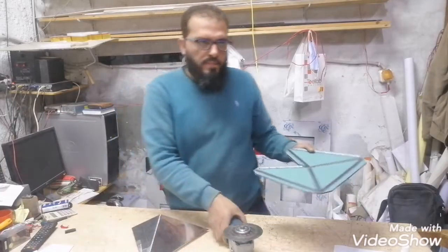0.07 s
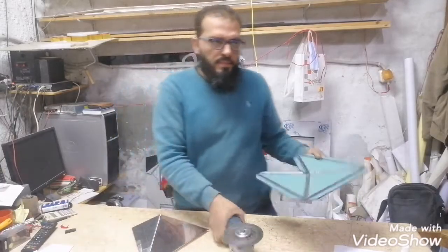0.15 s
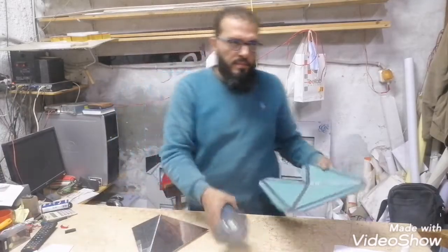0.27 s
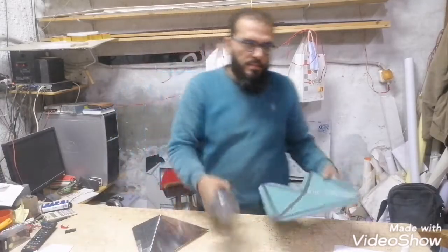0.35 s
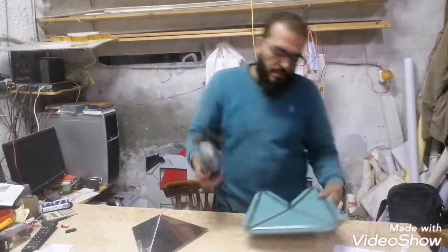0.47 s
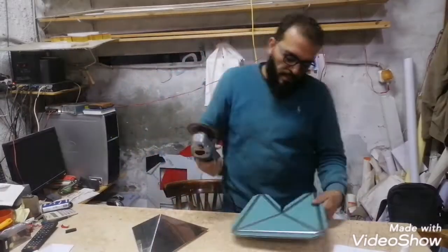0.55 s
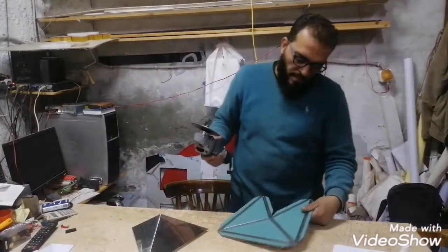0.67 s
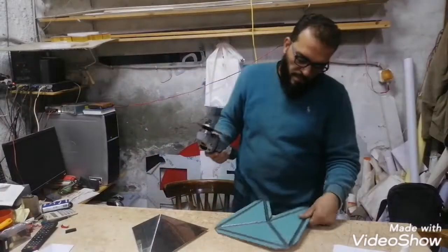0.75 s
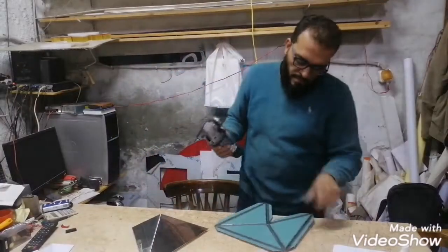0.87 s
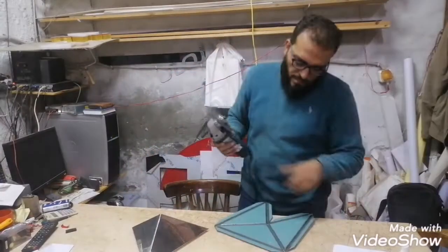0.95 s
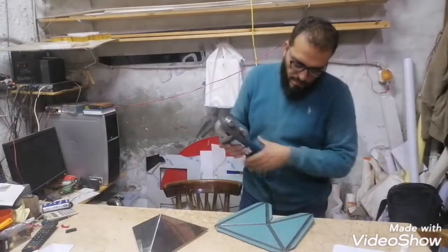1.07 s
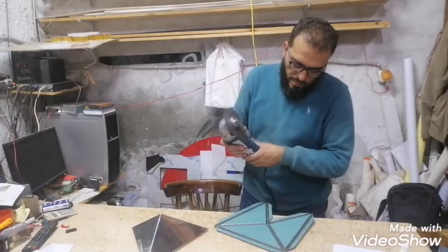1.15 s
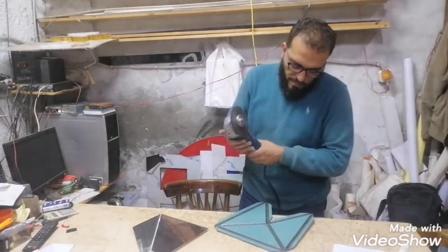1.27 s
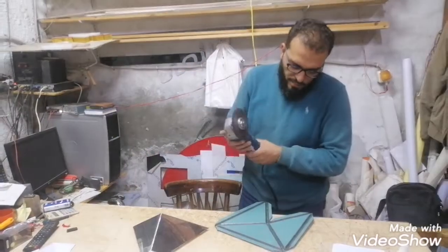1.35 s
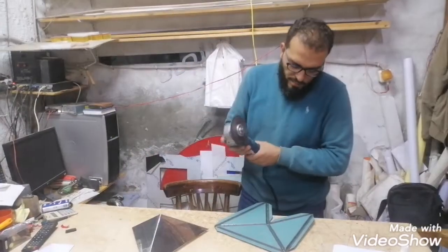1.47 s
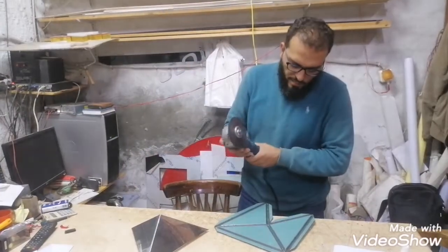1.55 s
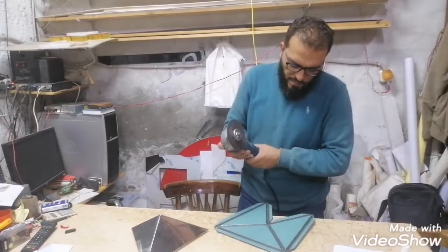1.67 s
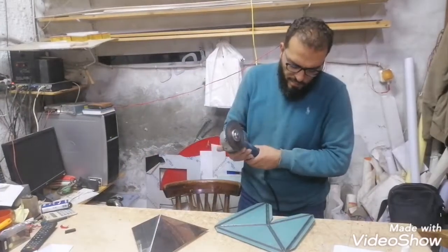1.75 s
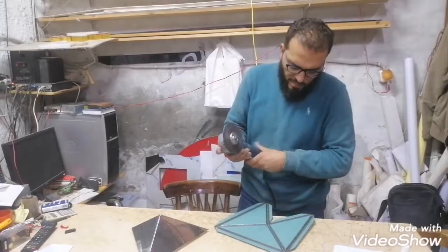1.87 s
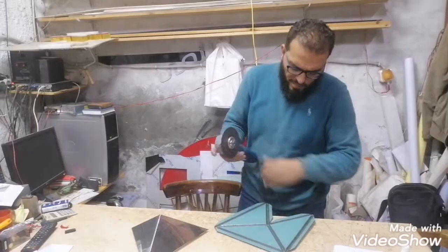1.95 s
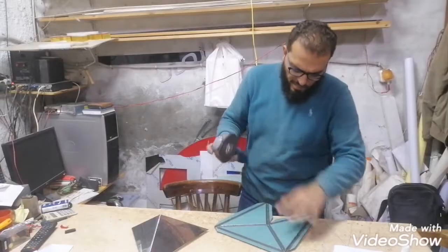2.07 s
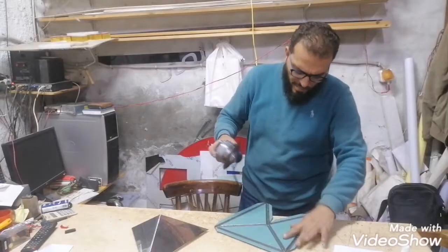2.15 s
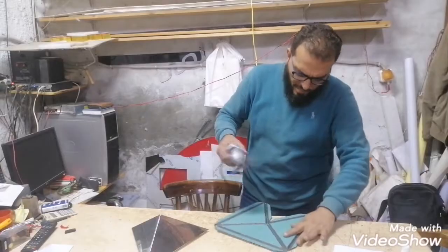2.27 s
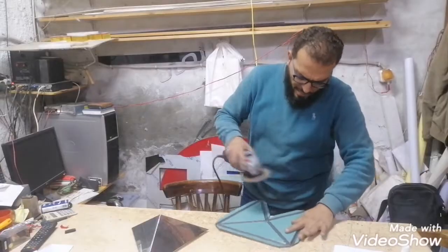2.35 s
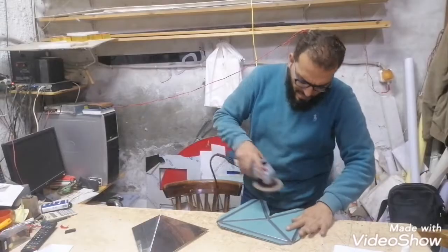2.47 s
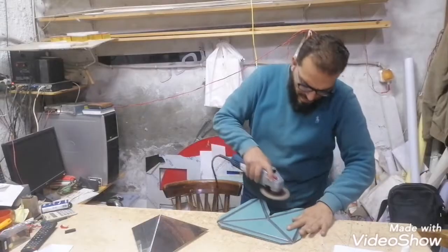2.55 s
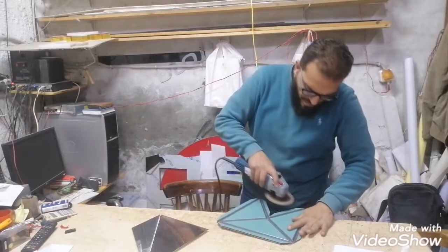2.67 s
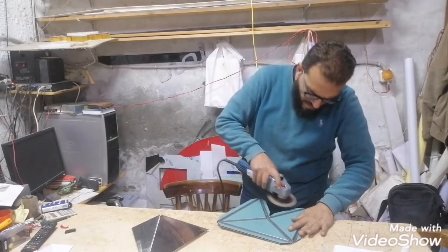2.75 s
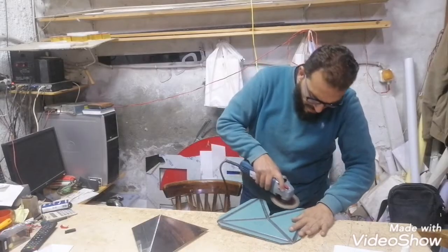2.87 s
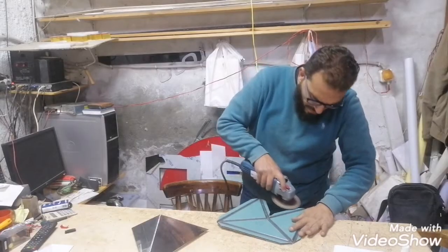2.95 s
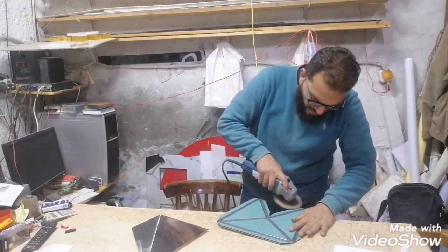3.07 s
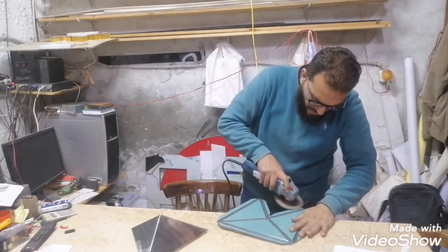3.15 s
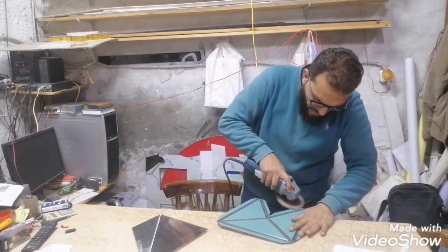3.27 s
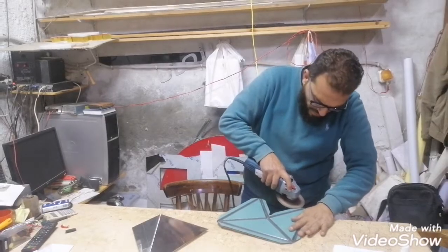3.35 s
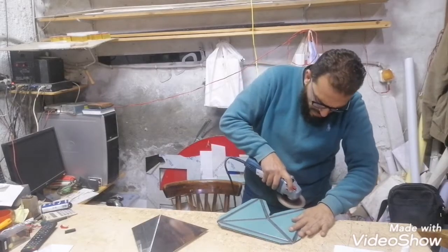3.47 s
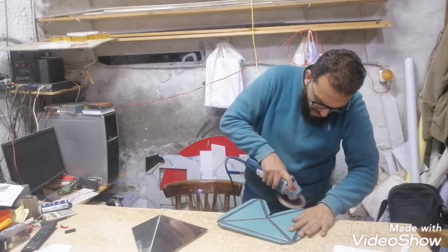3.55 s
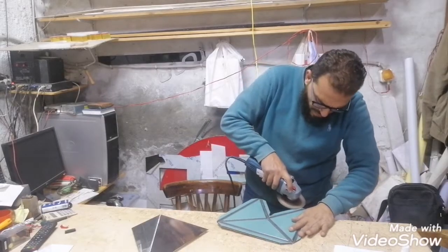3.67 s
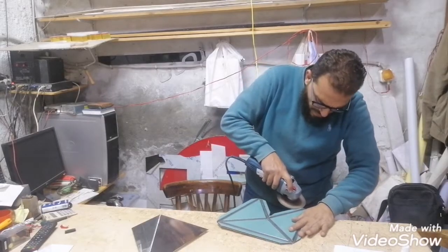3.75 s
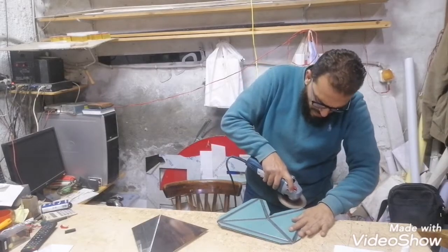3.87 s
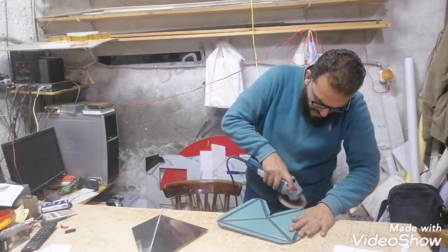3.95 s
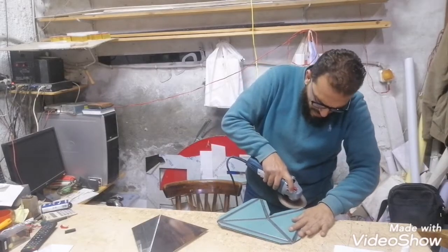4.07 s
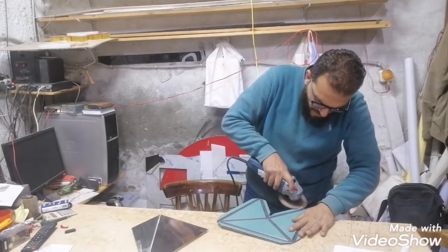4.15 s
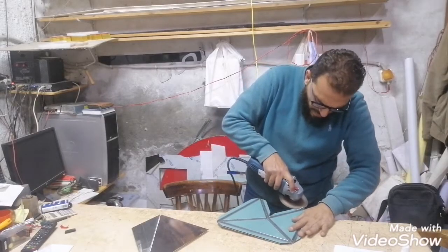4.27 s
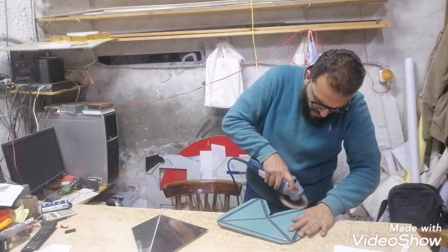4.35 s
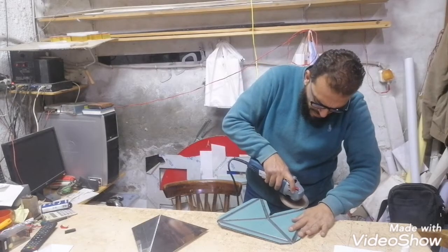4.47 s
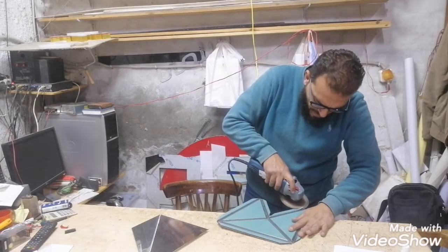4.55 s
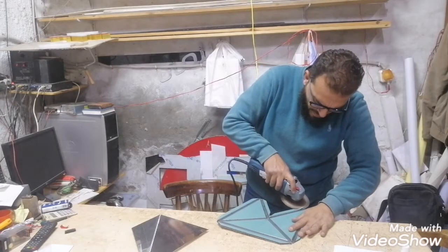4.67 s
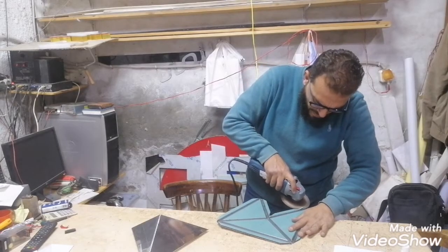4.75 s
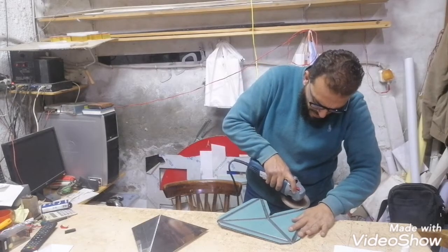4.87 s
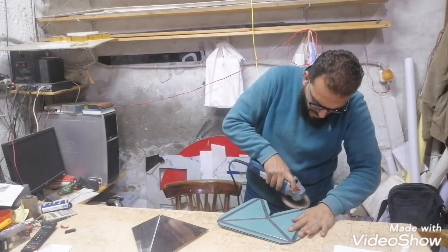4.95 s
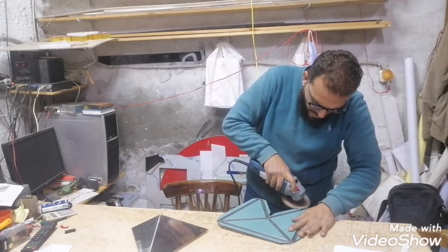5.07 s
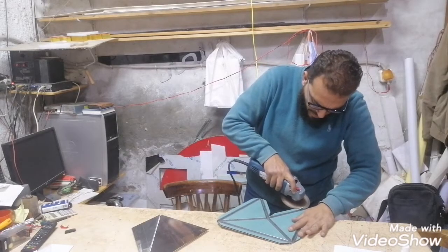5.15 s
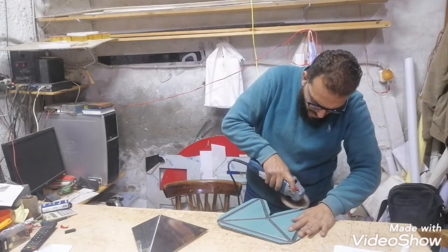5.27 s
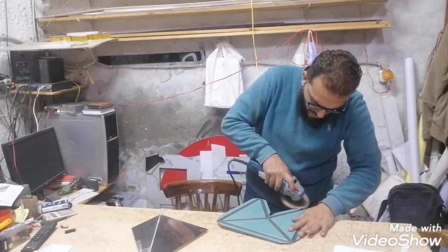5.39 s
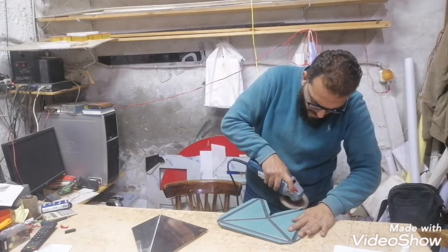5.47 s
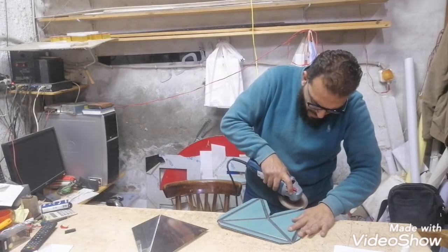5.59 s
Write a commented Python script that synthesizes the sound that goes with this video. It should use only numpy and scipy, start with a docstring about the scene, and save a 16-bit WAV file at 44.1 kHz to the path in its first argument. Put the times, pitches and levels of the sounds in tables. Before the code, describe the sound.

Tool scrapes off a workbench, a thin panel clatters down, then an angle grinder kicks on, spins up whining, and grinds steadily with a sagging rasp.

```python
"""In a small workshop a grinder is dragged off the bench with a thud: noise bands slide, bench tones ring.
A panel is then laid down and rattles to rest: short bursts of ringing tones and treble grit.
At about 1.6 s the grinder is switched on, kicks with the mains and spins up: tones and noise follow its speed.
At about 3.1 s the disc bites and slaps the panel once a turn, a stack of overtones, while the load slows it.
A low bench rumble lies underneath. Both channels carry the same sound."""
import sys
import numpy as np
from scipy import signal
from scipy.fft import rfft, irfft, next_fast_len
from scipy.io import wavfile
from scipy.ndimage import uniform_filter1d, map_coordinates

SR = 44100
rng = np.random.default_rng(int(sys.argv[2]) if len(sys.argv) > 2 else 0)


def wrap_up_sound(samples):
    """Save the sound to the file named by the first command line argument, as 16-bit audio."""
    columns = np.atleast_2d(samples).T
    # keep every value between -1 and 1, then stretch to whole-number steps
    tamed = np.clip(columns, -1, 1)
    steps = np.round(tamed * 32767).astype(np.int16)
    wavfile.write(sys.argv[1], SR, steps)


N = 247842  # length in samples

GEAR = 32 / 9  # armature turns for one disc turn
SWITCH_ON_S, BITE_S = 1.5885, 3.12  # the switch closes; the disc meets the panel

# the armature spins up free, then sags under the cut: start_s, armature_turns_per_s
ARMATURE_SPEED = [(1.6, 72), (1.635, 170), (1.67, 250), (1.712, 295), (1.778, 360), (1.936, 427),
                  (2.04, 454), (2.176, 483.5), (2.6, 522.5), (3.05, 536.5), (3.12, 543), (3.55, 528),
                  (3.86, 507.4), (4.09, 497), (4.4, 475.4), (4.68, 465), (5.03, 456.5), (5.45, 447.5),
                  (5.62, 446.5)]


def shaft_turns():
    """Disc speed, and the turns made so far; the armature runs GEAR times faster."""
    speed = curves(ARMATURE_SPEED)[0] / GEAR
    return speed, np.cumsum(speed) / SR


def mains_pulses():
    """Torque pulses counted from switch-on: a slightly slow start, then 100 a second, with jitter."""
    t = np.arange(N) / SR - SWITCH_ON_S
    steady = 96.5 * np.minimum(t, 0.2) + 100 * np.maximum(t - 0.2, 0)
    return steady - 0.12 + 0.08 * wobble(70)


# how loud the free armature tone is at each speed: pitch_hz, level_db
WHINE_LEVEL = [(68, -70), (230, -58), (320, -46), (380, -32), (427, -21), (490, -23), (520, -31),
               (545, -31)]
# how the housing passes the commutator's tone: pitch_hz, level_db
COMMUTATOR_LEVEL = [(800, -50), (2600, -40), (3100, -28), (3500, -28), (3850, -32), (4100, -38),
                    (4400, -29), (4640, -24), (4800, -27), (4920, -40), (5150, -37), (5450, -33),
                    (5700, -36), (5900, -37), (6000, -46), (6600, -58)]
# the 9 pinion teeth, running free: pitch_hz, level_db
PINION_LEVEL = [(600, -44), (1100, -30), (1350, -22), (1600, -24), (1850, -17.5), (2200, -18.5),
                (2400, -27), (2700, -34), (3300, -42), (3700, -35), (4000, -44), (5000, -55)]
# the pinion's second overtone, a rough chatter: pitch_hz, level_db
CHATTER_LEVEL = [(3000, -50), (4400, -38), (4950, -25.5), (5400, -29), (5700, -39), (6200, -33),
                 (6600, -40), (7200, -50), (9000, -60)]
LOADED_DB, LOADED_FALL_DB_PER_S = -34.5, 3  # armature tone under load, fading as the cut goes on
LOAD_HUSH_DB = 30  # commutator, pinion and chatter sink by this as the disc bites
TENTH_DB, TENTH_S = -42, 4.45  # the armature's tenth order joins under load


def motor_tones(speed, turns, mains):
    """The armature, commutator and pinion each sing at a fixed multiple of the shaft speed."""
    time = np.arange(N) / SR
    since_on = np.abs(time - SWITCH_ON_S)
    bite = after(BITE_S, 0.7)
    spin, pitch = GEAR * turns, GEAR * speed

    loaded_db = LOADED_DB - LOADED_FALL_DB_PER_S * (time - BITE_S)
    whine_db = (1 - bite) * along(WHINE_LEVEL, pitch) + bite * loaded_db
    whine = amp(whine_db + 1.6 * wobble(12)) * np.sin(2 * np.pi * spin)

    # the mains pulses shape these tones most strongly just after switch-on
    bars = amp(along(COMMUTATOR_LEVEL, 12 * pitch) + 1.8 * wobble(60))
    bars *= throb(mains, 0.55 + 1.5 * np.exp(-since_on / 0.08))
    bars *= np.sin(2 * np.pi * (12 * spin + 0.09 * wobble(150)))

    pinion = amp(along(PINION_LEVEL, 9 * pitch) + 2 * wobble(40))
    pinion *= throb(mains, 0.3 + 1.3 * np.exp(-since_on / 0.12))
    pinion *= np.sin(2 * np.pi * (9 * spin + 0.1 * wobble(150)))

    chatter = amp(along(CHATTER_LEVEL, 18 * pitch) + 3 * wobble(60)) * throb(mains, 1.6)
    chatter *= np.sin(2 * np.pi * (18 * spin + 0.3 * wobble(500)))

    tenth = amp(TENTH_DB + 3 * wobble(5)) * after(TENTH_S, 0.3) * np.sin(20 * np.pi * spin)
    tones = whine + amp(-LOAD_HUSH_DB * bite) * (bars + pinion + chatter) + tenth
    return np.sqrt(2) * after(SWITCH_ON_S, 0.001) * tones


# air and gear noise, levels before a small trim: start_s, roar_db, hiss_db, brightness_0_to_1
RUSH_LEVEL = [(1.59, -17.5, -31, 0.97), (1.7, -19, -33, 0.98), (1.77, -21.5, -27.5, 0.72),
              (1.94, -15, -23, 0.73), (2.15, -16.5, -23, 0.41), (2.24, -14.5, -21, 0.7),
              (2.45, -17, -21, 0.57), (2.71, -14.5, -20.5, 0.6), (3.06, -15.5, -21.5, 0.25),
              (3.5, -16.5, -23.5, 0.32), (3.96, -19, -27.5, 0.46), (4.3, -17.5, -25, 0.27),
              (4.77, -19, -26.5, 0.27), (5.34, -17.5, -25.5, 0.52), (5.62, -19.5, -25.5, 0.24)]
# tone colour of the roar when dull, then when bright: pitch_hz, level_db_per_hz
DULL_ROAR = [(35, -67), (70, -30), (150, -24.5), (437, -14), (512, -5.5), (559, -10), (690, -5),
             (883, -3.5), (1370, -3), (1950, -6.5), (2770, -19), (4000, -12.5), (5200, -78), (8800, -120)]
BRIGHT_ROAR = [(35, -61), (60, -68), (96, -40), (147, -45), (188, -16.5), (297, -18), (360, -12.5),
               (521, -4.5), (1230, -6), (2020, 1), (4000, -13), (5200, -88), (8800, -120)]
# tone colour of the hiss running free, then cutting: pitch_hz, level_db_per_hz
FREE_HISS = [(1470, 5), (2500, 3), (3310, -4.5), (4010, 0), (4730, -1.5), (5660, -1.5), (6270, -9.5),
             (7500, -5.5), (8480, -12.5), (9270, -11.5), (10100, -20), (11700, -26.5), (12900, -55),
             (16800, -71), (22000, -120)]
CUTTING_HISS = [(1470, -62), (2500, -5), (2610, -7), (3050, -9), (3350, -5.5), (3650, -2), (4130, -2),
                (4450, -2), (6190, -14.5), (7860, -12), (10900, -25.5), (12200, -51), (12900, -44),
                (16800, -80), (22000, -120)]
# a hump in the roar slides about before the cut, and swells again near the end: start_s, pitch_hz, level_db
ROAR_HUMP = [(1.9, 1900, -51), (2.1, 2000, -30), (2.3, 2116, -29), (2.42, 1262, -24.5), (2.55, 1349, -22.5),
             (2.65, 1501, -21.5), (2.76, 1850, -19.5), (2.88, 1690, -25), (3.0, 1893, -25),
             (3.2, 1510, -51), (5.32, 1500, -54), (5.45, 1504, -26), (5.58, 1434, -37)]
# a breathy whistle in the treble: start_s, pitch_hz, level_db
TREBLE_WHISTLE = [(2.5, 7200, -60), (2.7, 7300, -44), (3.0, 7600, -42), (3.45, 7880, -44), (3.8, 7700, -50),
                  (4.1, 7900, -47), (5.62, 7780, -46)]
# a low drone while the motor gathers speed: start_s, pitch_hz, level_db
LOW_DRONE = [(1.58, 185, -57), (1.75, 193, -49.5), (1.9, 225.1, -44), (2.05, 240, -58)]


def air_and_gear_noise(turns, mains):
    """Fan and gears make broad noise, beaten by the mains torque and, under load, by the disc."""
    roar_db, hiss_db, bright = curves(RUSH_LEVEL)
    since_on = np.abs(np.arange(N) / SR - SWITCH_ON_S)
    bite = after(BITE_S, 0.7)
    kick = 0.55 * np.exp(-since_on / 0.22)  # torque pulses are hardest while the armature is slow

    share = np.clip(bright, 0, 1)
    roar = np.sqrt(1 - share) * noise(DULL_ROAR, patchy_db=-0.5)
    roar += np.sqrt(share) * noise(BRIGHT_ROAR, patchy_db=1.0)
    roar *= amp(roar_db - 4 + 0.99 * wobble(25.21)) * throb(mains, kick) * throb(turns, 0.0057 * bite)

    hiss = np.sqrt(1 - bite) * noise(FREE_HISS, patchy_db=1.5)
    hiss += np.sqrt(bite) * noise(CUTTING_HISS, patchy_db=1.0)
    hiss *= amp(hiss_db + 0.64 * wobble(30)) * throb(mains, kick + 0.083) * throb(turns, 0.28 * bite)

    bands = narrow(ROAR_HUMP, width_hz=600, rough_db=1.0)
    bands += narrow(TREBLE_WHISTLE, width_hz=450, rough_db=2)
    bands += narrow(LOW_DRONE, width_hz=40, rough_db=1)
    return after(SWITCH_ON_S, 0.001) * (roar + hiss + bands)


# tone colour of the gear housing: pitch_hz, level_db_per_hz
HOUSING_COLOUR = [(1200, -40), (1700, -37), (2150, 1), (2700, -8), (3600, -26), (4500, -8), (5100, -8.5),
                  (5800, -6.5), (8000, -28), (11000, -68)]
# gear slack knocking with the mains torque: start_s, level_db
GEAR_KNOCK = [(1.588, -29), (1.62, -29), (1.655, -23), (1.68, -27), (1.705, -21), (1.74, -24), (1.8, -28),
              (2.0, -30), (2.3, -68)]
# the disc guard's rattle, before its mains swells: start_s, pitch_hz, level_db
GUARD_RATTLE = [(2.15, 3900, -55), (2.27, 4100, -32), (2.5, 4250, -30), (2.6, 4100, -45), (3.3, 4000, -40),
                (4.0, 4000, -40), (4.27, 4050, -31), (4.45, 4100, -34), (4.62, 4050, -29),
                (4.75, 4050, -32), (4.92, 4000, -34), (5.1, 4000, -39), (5.62, 4000, -38)]


def rattles(mains):
    """Gear slack and disc guard are shaken at twice the mains rate, so their noise comes in pulses."""
    since_on = np.abs(np.arange(N) / SR - SWITCH_ON_S)
    guard = amp(3.5 * wobble(70)) * throb(mains, 2.2) * narrow(GUARD_RATTLE, width_hz=450, rough_db=1.5)
    knock = amp(curves(GEAR_KNOCK)[0] + 2.2 * wobble(70)) * noise(HOUSING_COLOUR, patchy_db=3)
    knock *= throb(mains, 1.2 + 1.6 * np.exp(-since_on / 0.2))
    return after(SWITCH_ON_S, 0.001) * (guard + knock)


# the tool body ringing at switch-on, before a trim: pitch_hz, level_db, fade_60db_s
BODY_LURCH = [(578, -7, 0.11), (1130, -6, 0.022), (1700, -8, 0.016), (2460, -6, 0.017), (5000, -10, 0.016)]
HUM_DB, HUM_FADE_60DB_S = -49, 0.9  # mains hum


def switch_on():
    """A faint few milliseconds of noise just before the motor starts, then body ringing and a fading mains hum."""
    t = np.arange(N) / SR - SWITCH_ON_S
    lead_in = amp(-39) * after(SWITCH_ON_S - 0.004, 0.001) * (t < 0)
    lead_in = lead_in * noise(HOUSING_COLOUR, patchy_db=1.5)
    hum = amp(HUM_DB - 60 * np.abs(t) / HUM_FADE_60DB_S) * np.sin(2 * np.pi * 100 * t)
    lurch = np.pad(amp(-15.5) * ring(BODY_LURCH, 0.00071), (round(SWITCH_ON_S * SR), N))
    return lead_in + after(SWITCH_ON_S, 0.001) * hum + lurch[:N]


# slap along the cut: start_s, level_db, answer (0 to 4, blends five panel colours)
SLAP_LEVEL = [(3.12, -16, 3.7), (3.2, -23.5, 0.97), (3.45, -22.5, 0.07), (3.6, -22.5, 1.3),
              (3.7, -23.5, 2.1), (3.88, -22.5, 2.3), (4.05, -26, 2.67), (4.35, -26.5, 3),
              (4.95, -27.5, 3.12), (5.25, -29, 3.8), (5.62, -27.5, 3.53)]
# the five panel colours, answers 0 to 4 to the slap: pitch_hz, level_db
PANEL_COLOUR_0 = [(380, -42), (650, -12), (1050, -13), (1330, -13), (1460, -22), (1680, -1.5), (1950, -7),
                  (2450, -19), (2670, -17), (2880, -5.5), (3080, -16), (3450, -17), (3750, -8), (4290, -30),
                  (7260, -120)]
PANEL_COLOUR_1 = [(380, -46), (650, 3), (841, -71), (1240, -12), (1440, -8.5), (1740, -4.5), (2160, -15),
                  (2410, -28), (2620, -12.5), (2850, -14), (3100, -28), (4200, -30), (5460, -44),
                  (9240, -120)]
PANEL_COLOUR_2 = [(380, -34), (650, -21), (860, -11.5), (1010, -21), (1155, -13), (1300, -4), (1445, -1.5),
                  (1590, -4), (1735, -9), (1880, -6.5), (2020, -9.5), (2310, -17), (2460, -20), (2620, -13),
                  (2760, -20), (2890, -15), (3300, -22), (4290, -39), (7260, -120)]
PANEL_COLOUR_3 = [(380, -47), (660, -12.5), (790, -5.5), (920, -25), (1050, -8), (1185, -14.5),
                  (1310, -13.5), (1445, -2.5), (1580, -1.5), (1710, -9.5), (1845, -19), (1975, -2),
                  (2110, -8.5), (2240, -8.5), (2400, -11), (2600, -23), (2760, -11.5), (2950, -18),
                  (3300, -21), (4290, -40), (7260, -120)]
PANEL_COLOUR_4 = [(380, -40), (650, -1), (997, -6), (1130, -10.5), (1260, 0.5), (1380, -7), (1520, -3.5),
                  (1670, -10), (1890, -13), (2080, 1), (2180, -10), (2320, -14), (2690, -27), (2920, -5),
                  (3300, -13), (4290, -44), (7260, -120)]
# the sharpest panel modes lift an overtone passing them: pitch_hz, width_hz, lift_db
PANEL_LIFTS = [(1433, 79, 7), (1736, 35, 10), (2630, 58, 9), (1093, 41, 8.5), (3216, 19, 12.5)]
# resonances that lift the high overtones: pitch_hz, width_hz, lift_db
HIGH_LIFTS = [(6950, 130, 6), (7880, 170, 7)]
# levels of the four lowest disc overtones, by pitch as the disc slows: pitch_hz, level_db
LOW_OVERTONES = [(124, -38), (128, -35.5), (136, -39), (142, -51.5), (154, -51.5), (250, -30.5), (256, -36),
                 (261, -48), (272, -30.5), (285, -29.5), (302, -38), (376, -36.5), (391, -45), (420, -34),
                 (455, -32.5), (503, -32), (520, -46.5), (572, -28), (610, -39)]
# some disc overtones are stronger than others: lift_db, one for each order from 5 to 37
ORDER_LIFT = [-0.5, 0, -0.5, 1.5, 1.5, 1, 0.5, -2.5, 2.5, 1, 2, 1, 2.5, -0.5, 2, 3, -4, 0, 3, -1.5, -0.5,
              -4, -1, -2, 3, 3, 2, -1, 1.5, -3, -4, -7, -8]
# the slap spreads over the turn: start_s, phase_scatter_rad (before its growth with order)
SLAP_SMEAR = [(3.12, 1.2), (3.6, .5), (3.95, .5), (4.15, 1.6), (5.62, 2)]
# the gear case rings for orders near the tooth mesh: pitch_hz, level_db
GEAR_CASE = [(3700, -45), (3940, -43), (4010, -32), (4130, -31.5), (4215, -33), (4320, -42), (4600, -45),
             (4900, -43), (5500, -48)]
MESH_DB = 2.5  # lift of the mesh order itself
SIDE_GROW_DB, SIDE_FROM_S, SIDE_RISE_S = 11, 3.95, 0.33  # its neighbours grow as the load builds
RING_SINKS_HZ, SINK_FROM_S, SINK_S = 110, 4.3, 0.5  # the case ring starts higher and settles
UNBALANCE_S = 2.82  # the disc's once-a-turn shake reaches the bench


def disc(speed, turns):
    """The disc's high spot slaps the panel once a turn; under load the 32 crown teeth sing, with neighbours."""
    slap_db, answer = curves(SLAP_LEVEL)
    smear = curves(SLAP_SMEAR)[0]
    phase = 2 * np.pi * (turns + 0.00041 * wobble(40))

    low = []
    for k in range(1, 5):
        level = amp(along(LOW_OVERTONES, k * speed) + 1.8 * wobble(9))
        low.append(np.sqrt(2) * level * np.sin(k * phase + k))
    shake, out = low[0], sum(low[1:])

    colours = (PANEL_COLOUR_0, PANEL_COLOUR_1, PANEL_COLOUR_2, PANEL_COLOUR_3, PANEL_COLOUR_4)
    weights = [np.clip(1 - np.abs(np.clip(answer, 0, 4) - i), 0, 1) for i in range(5)]
    for k in range(5, 29):
        answer_db = sum(weight * along(colour, k * speed) for weight, colour in zip(weights, colours))
        answer_db += lift(PANEL_LIFTS, k * speed) + ORDER_LIFT[k - 5]
        # each overtone lags as the slap rings on in the modes near it
        lag = np.arctan((k * speed - 1450) / 400) + smear * rng.normal(0, k / 11)
        out += np.sqrt(2) * amp(slap_db + answer_db + 1.5 * wobble(5)) * np.cos(k * phase - lag)

    ring_shift_hz = RING_SINKS_HZ * (1 - after(SINK_FROM_S, SINK_S))
    for k in range(29, 38):
        lift_db = MESH_DB if k == 32 else SIDE_GROW_DB * (after(SIDE_FROM_S, SIDE_RISE_S) - 1)
        level_db = along(GEAR_CASE, k * speed - ring_shift_hz) + lift_db + ORDER_LIFT[k - 5]
        out += np.sqrt(2) * amp(level_db + 1.5 * wobble(8)) * np.sin(k * phase + rng.normal(0, 0.3))

    # faint high overtones carry the colour of the hiss and come and go
    for k in range(38, 66):
        level_db = slap_db - 14 + along(CUTTING_HISS, k * speed) + lift(HIGH_LIFTS, k * speed)
        out += amp(level_db + 3 * wobble(6)) * np.sin(k * phase + rng.normal(0, 2))
    return after(BITE_S, 0.1) * out + after(UNBALANCE_S, 0.082) * shake


# the panel touching the bench, before a trim: start_s, level_db, treble_db
PANEL_TAPS = [(0.387, -41.5, -25), (0.491, -47, -12), (0.569, -46, -6), (0.608, -25, -15),
              (0.618, -37.5, 5), (0.697, -40, 2.5), (0.77, -5.5, -24), (0.785, -4, -18), (0.796, -6, -16.5),
              (0.823, -17, -22), (0.847, -8.5, -12.5), (0.858, -16, -12), (0.868, -17.5, -18),
              (0.876, -35, -7), (0.942, -18, -19), (0.949, -20.5, -28), (1.056, -20, -28),
              (1.077, -24.5, -16)]
# tones the panel rings with: pitch_hz, level_db, fade_60db_s
PANEL_TONES = [(460, -8, .04), (590, -3, 0.035), (874, -2, 0.045), (1054, -6, 0.04), (1293, -3, 0.046),
               (1500, -6, 0.038), (1823, -4, 0.03), (2020, -0.5, 0.03), (2490, -13, 0.025),
               (2830, -14, 0.025)]
# treble colour of a tap: pitch_hz, level_db_per_hz
TAP_TREBLE = [(2000, -30), (2600, -3), (3100, -9), (3700, 2), (4150, -8), (4600, 0), (5200, -6), (5800, -2),
              (7000, -12), (8500, -24), (10000, -60)]
REBOUND_S, REBOUND_DB = 0.0052, -7.5  # the panel springs back onto the bench after each tap
CRACK_FADE_60DB_S, BUZZ_FADE_60DB_S, BUZZ_DB = 0.007, 0.03, -12


def panel_taps():
    """Each touch rings the panel's tones, with a sharp crack and a longer buzz, then rings it again."""
    out = np.zeros(N + SR)
    t, grit = np.arange(SR // 3) / SR, noise(TAP_TREBLE, patchy_db=2)
    snap = amp(-60 * t / CRACK_FADE_60DB_S) + amp(BUZZ_DB - 60 * t / BUZZ_FADE_60DB_S)
    snap *= 1 - np.exp(-t / 0.0001)
    for start, db, treble_db in PANEL_TAPS:
        at = round(start * SR)
        again = at + round(REBOUND_S * SR)
        treble = amp(treble_db + 12) * snap * grit[at:][:len(t)]
        out[at:][:len(t)] += amp(db - 11) * (ring(PANEL_TONES, 0.0004) + treble)
        out[again:][:len(t)] += amp(db - 11 + REBOUND_DB) * ring(PANEL_TONES, 0.0006)
    return out[:N]


# blows on the bench top, before a trim: start_s, level_db
BENCH_THUDS = [(.187, -26), (0.196, -27), (.206, -32), (0.233, -34), (0.268, -35), (.281, -34), (.31, -40),
               (.389, -46), (0.77, -34), (0.791, -31), (0.821, -32), (.848, -38), (.943, -31),
               (.951, -30.5)]
# tones the bench rings with: pitch_hz, level_db, fade_60db_s
BENCH_TONES = [(99, -6, .06), (147, -1.5, 0.07), (219, -1, 0.11), (281, 4.5, 0.06), (377, -5, 0.075),
               (482, -0.5, 0.058), (590, -6.5, .03)]


def bench_thuds():
    """Each blow rings the low tones of the bench top."""
    out = np.zeros(N + SR)
    for start, db in BENCH_THUDS:
        out[round(start * SR):][:SR // 3] += amp(db - 2.0) * ring(BENCH_TONES, 0.002)
    return out[:N]


# tone colour of the dull scuff, then of the airy swish: pitch_hz, level_db_per_hz
SCUFF_COLOUR = [(120, -70), (200, -13), (300, -8), (572, -16), (690, -6), (1120, -9), (1950, -10),
                (2760, -12.5), (3160, -13.5), (5000, -28), (6500, -53), (11000, -120)]
SWISH_COLOUR = [(880, -52), (1500, -9), (1740, -8.5), (2180, -13), (2670, -7.5), (3020, -9.5), (5840, -1.5),
                (9710, -25.5), (11000, -37), (14300, -69), (22000, -120)]
# narrow scrapes of an edge on the bench: start_s, length_s, pitch_hz, level_db
EDGE_SCRAPES = [(0.198, .15, 1250, -54), (.42, .16, 2760, -65), (0.485, .014, 2950, -55),
                (0.737, .03, 2910, -54), (0.562, 0.05, 2800, -54), (.69, .018, 2050, -48),
                (.955, .07, 4800, -54), (1.086, 0.065, 2200, -46), (1.09, 0.13, 1550, -45),
                (1.165, 0.056, 5100, -57.5), (1.183, 0.036, 2740, -46), (1.195, 0.096, 1975, -46),
                (1.287, 0.055, 3250, -64.5)]
SCUFF_FALL = 0.3  # the scuff falls slower than the swish


def slides():
    """Hands, tool and panel rub along the bench: coloured noise with narrow scrapes."""
    scuff = strokes(order=1, slower=SCUFF_FALL) * amp(3 * wobble(40)) * noise(SCUFF_COLOUR, patchy_db=3)
    swish = strokes(order=0, slower=1) * amp(1.5 * wobble(40)) * noise(SWISH_COLOUR, patchy_db=3.5)
    scrapes = sum(scrape(*row) for row in EDGE_SCRAPES)
    return (scuff + swish + scrapes) * (1 - after(1.6, 0.34))


def scrape(start, length, hz, db):
    """One short band of noise around a pitch."""
    band = narrow([(0, hz, 0)], width_hz=350, rough_db=2.5)
    return stroke(start, rise=0.0063, length=length, fall_db=60, db=db) * band


# sliding on the bench: start_s, rise_s, length_s, fall_db_per_s (of the swish), swish_db, scuff_db, rumble_db
SLIDE_STROKES = [(0.032, 0.065, 0.31, 170, -27.5, -61, -42), (0.538, 0.054, 0.27, 2, -55, -52, -49),
                 (.765, 0.027, 0.12, 200, -46, -39, -32), (0.848, 0.0033, 0.1, 300, -56, -42.5, -30),
                 (0.935, 0.023, 0.261, 54, -46.5, -46.5, -45.5), (1.258, 0.017, 0.025, 100, -69, -57, -53)]
# level between strokes: swish_db, scuff_db, rumble_db
QUIET_LEVEL = [-79, -62.5, -57.5]


def strokes(order, slower):
    """All strokes for one layer (0 swish, 1 scuff, 2 rumble), over its quiet level."""
    moves = sum(stroke(*row[:3], slower * row[3], row[4 + order]) for row in SLIDE_STROKES)
    return amp(QUIET_LEVEL[order]) + moves


RELEASE_S, RISE_DB = 0.03, 33.5  # a stroke climbs by RISE_DB, and sinks as far in each RELEASE_S at its end


def stroke(start, rise, length, fall_db, db):
    """Gain of one stroke: rise, slow fall, release."""
    t = np.arange(N) / SR - start - rise
    shape_db = np.where(t < 0, RISE_DB * t / rise, -fall_db * t)
    shape_db -= RISE_DB * np.maximum(t + rise - length, 0) / RELEASE_S
    return amp(np.maximum(db + shape_db, -140))


# tone colour of the bench rumble: pitch_hz, level_db_per_hz
RUMBLE_TONE = [(15, -4), (40, -4), (100, -5), (160, -7), (300, -52)]
# a hand leans on the panel: start_s, rise_s, length_s, fall_db_per_s, rumble_db (before a trim)
HAND_LEAN = (2.2, .25, 1.0, 10, -50)
RUMBLE_FALL = 0.6  # the rumble falls slower than the swish


def rumble():
    """Low rumble of the bench under hands and tool; it swells and sinks by chance."""
    level = strokes(order=2, slower=RUMBLE_FALL) + stroke(*HAND_LEAN)
    return amp(-7 + 3.5 * wobble(12) + 2.2 * wobble(4)) * level * noise(RUMBLE_TONE, patchy_db=1.0)


def room(x):
    """A short, cluttered room tail: fading random echoes after a brief gap."""
    t = np.arange(SR // 3) / SR
    tail = amp(-60 * t / 0.36) * rng.standard_normal(len(t))
    return signal.fftconvolve(np.pad(x, (300, 0)), tail / np.linalg.norm(tail))[:N]


def ring(modes, attack):
    """One blow: every mode sounds at a new strength and phase, then fades."""
    t = np.arange(SR // 3) / SR
    tones = np.zeros(len(t))
    for hz, db, fade_s in modes:
        level = amp(db + rng.normal(0, 2.8) - 60 * t / fade_s)
        tones += level * np.sin(2 * np.pi * (hz * t + rng.random()))
    return tones * (1 - np.exp(-t / attack))


def noise(spectrum, patchy_db):
    """Coloured noise of rms 1 with patches of random gain."""
    z = signal.stft(rng.standard_normal(N + 512), nperseg=512)[2]
    patches = uniform_filter1d(uniform_filter1d(rng.standard_normal(z.shape), 5, 0), 8, 1)
    x = signal.istft(z * amp(patchy_db * unit(patches)), nperseg=512)[1][:N]
    m = next_fast_len(N + 8192)
    colour = amp(along(spectrum, np.fft.rfftfreq(m, 1 / SR)))
    return unit(irfft(rfft(x, m) * colour, m)[:N])


def narrow(table, width_hz, rough_db):
    """Narrow noise that follows rows of start_s, pitch_hz, level_db."""
    hz, db = curves(table)
    turn = 2 * np.pi * np.cumsum(hz) / SR
    band = wobble(width_hz) * np.sin(turn) + wobble(width_hz) * np.cos(turn)
    return amp(db + rough_db * wobble(30.1)) * unit(band)


def throb(turns, sharp):
    """A swell once a turn, of mean power near 1."""
    return np.exp(sharp * np.cos(2 * np.pi * turns)) / np.sqrt(np.i0(2 * sharp))


def wobble(rate):
    """A smooth random curve, rate knots a second."""
    knots = rng.standard_normal(int(N * rate / SR) + 4)
    return map_coordinates(knots, [np.arange(N) * rate / SR])


def after(start, rise):
    """0 before start, then a ramp up to 1."""
    return np.clip((np.arange(N) / SR - start) / rise, 0, 1)


def curves(rows):
    """One value per sample for each column after the time."""
    s, *cols = np.transpose(rows)
    return [np.interp(np.arange(N) / SR, s, c) for c in cols]


def along(points, hz):
    """Level in dB at a pitch, read between the points on a log pitch axis."""
    f, db = np.transpose(points)
    return np.interp(np.log(hz + 1), np.log(f + 1), db, -120, -120)


def lift(peaks, hz):
    """Extra dB near resonances given as pitch_hz, width_hz, lift_db."""
    return sum(db / (1 + ((hz - centre) / width) ** 2) for centre, width, db in peaks)


def amp(db):
    """Decibels to a plain gain."""
    return 10 ** (np.asarray(db) / 20)


def unit(x):
    """Scale to rms 1."""
    return x / np.sqrt(np.mean(x ** 2) + 1e-20)


def scene():
    """Grinder, disc, handling and rumble added up; only the handling gets a room tail."""
    speed, turns = shaft_turns()
    mains = mains_pulses()
    motor = motor_tones(speed, turns, mains) + air_and_gear_noise(turns, mains)
    motor += rattles(mains) + switch_on()
    hands = slides() + panel_taps() + bench_thuds()
    mono = motor + disc(speed, turns) + hands + amp(-10.0) * room(hands) + rumble()
    return np.array([mono, mono])


TOP_HZ = 13049  # band limit


def record(dry):
    """Peaks are rounded off softly; nothing is kept above the band limit."""
    soft = dry / (1 + np.abs(dry / 0.78) ** 4) ** (1 / 4)
    m = next_fast_len(N + 8192)
    return irfft(rfft(soft, m) * (np.fft.rfftfreq(m, 1 / SR) < TOP_HZ), m)[:, :N]


dry = scene()
out = record(dry)
wrap_up_sound(out)
```